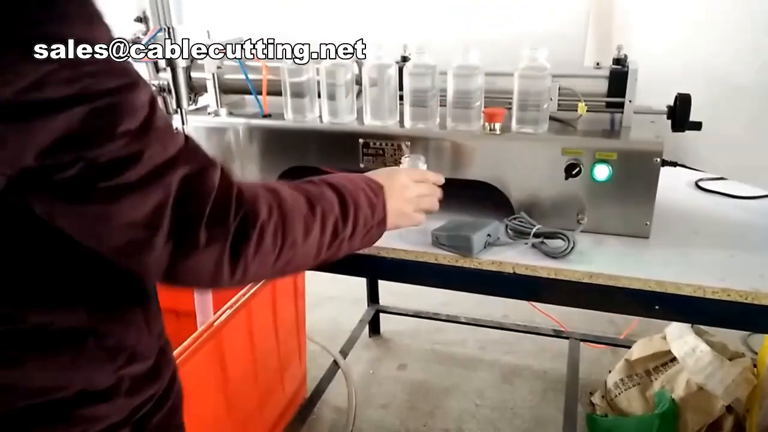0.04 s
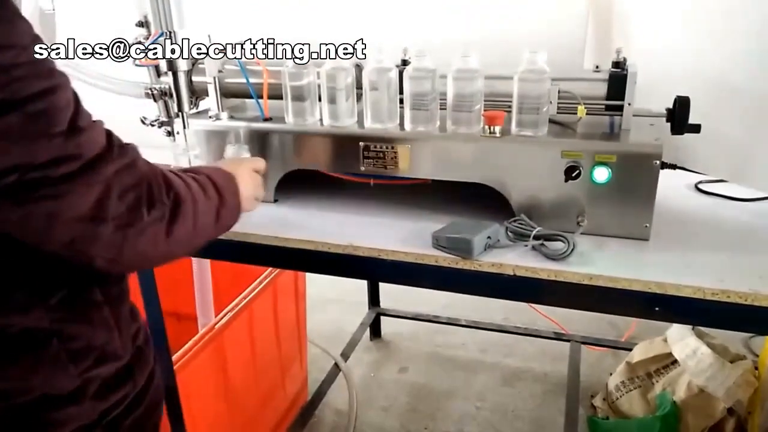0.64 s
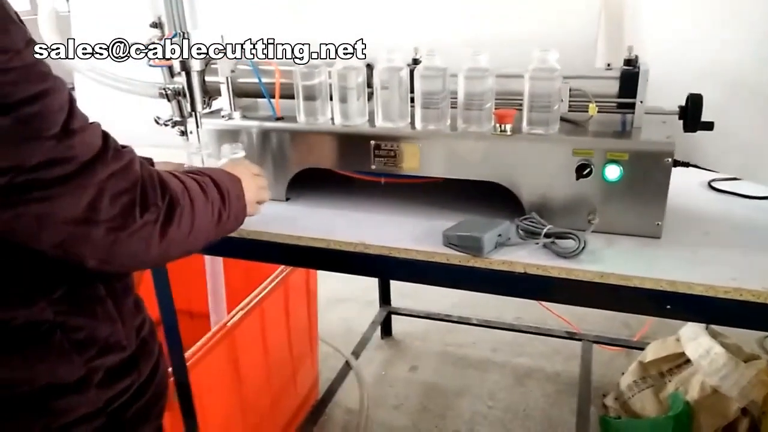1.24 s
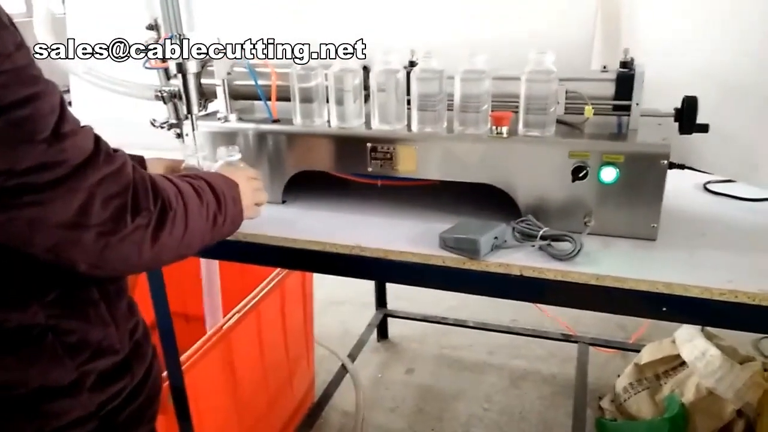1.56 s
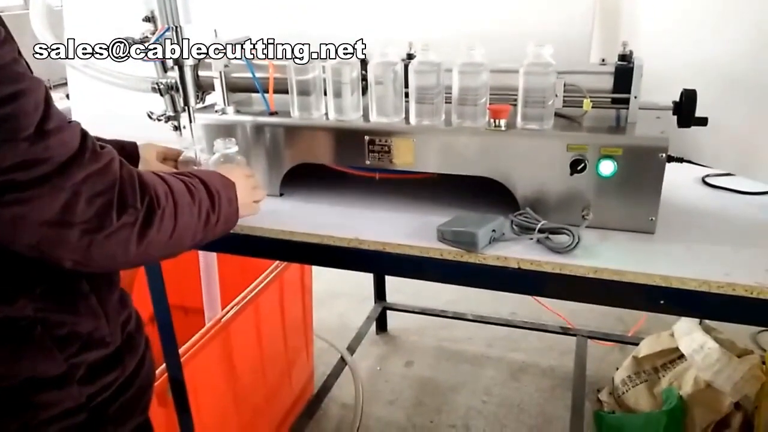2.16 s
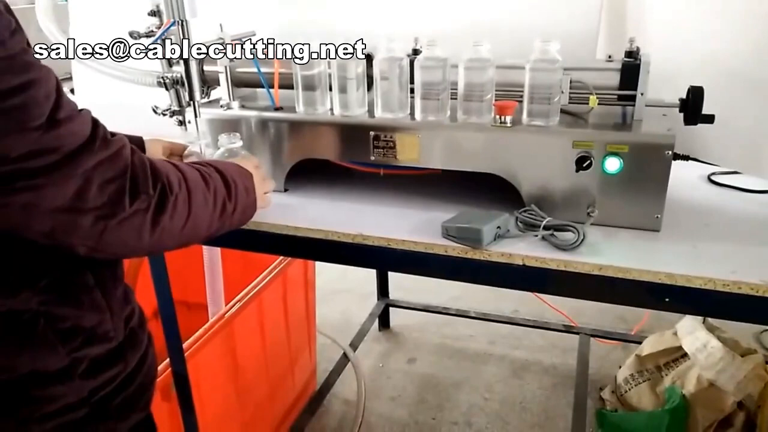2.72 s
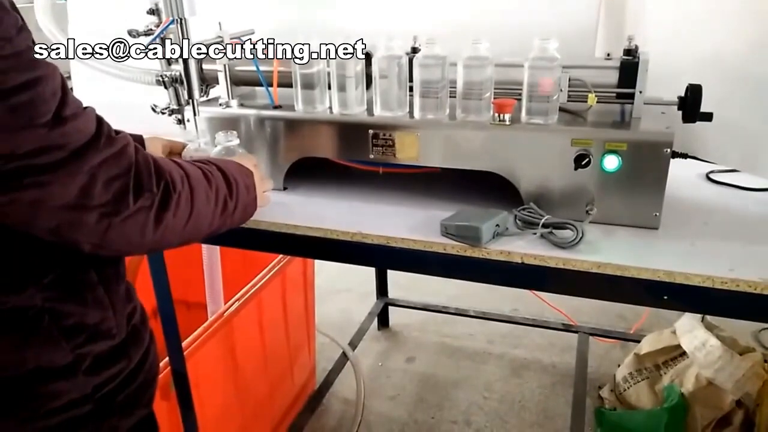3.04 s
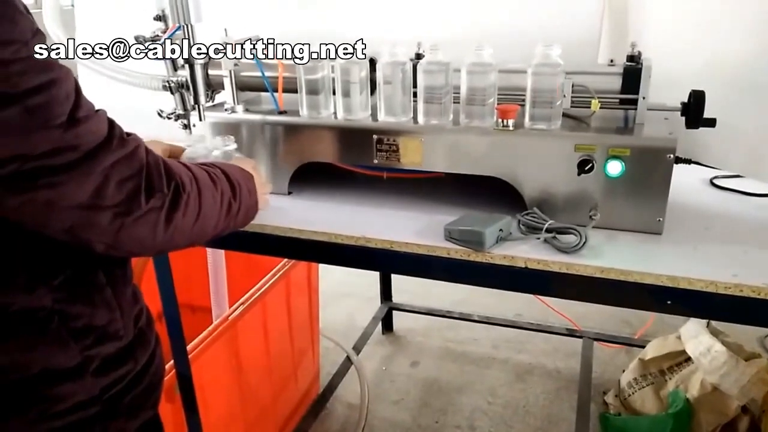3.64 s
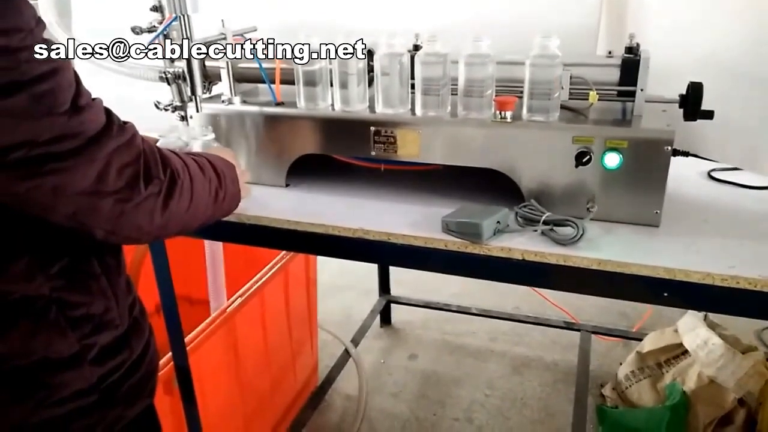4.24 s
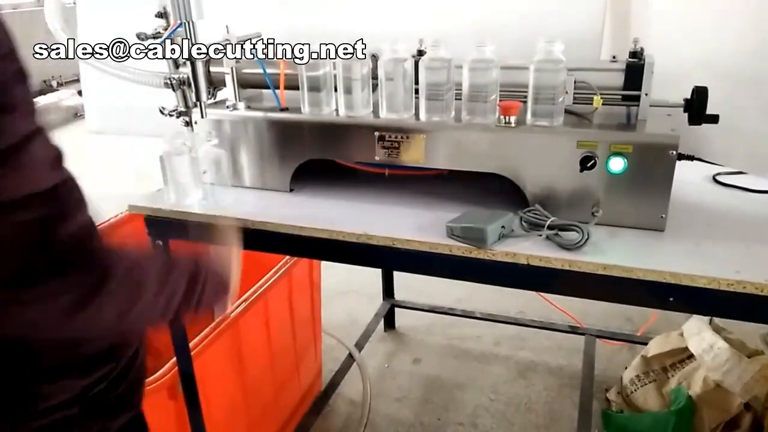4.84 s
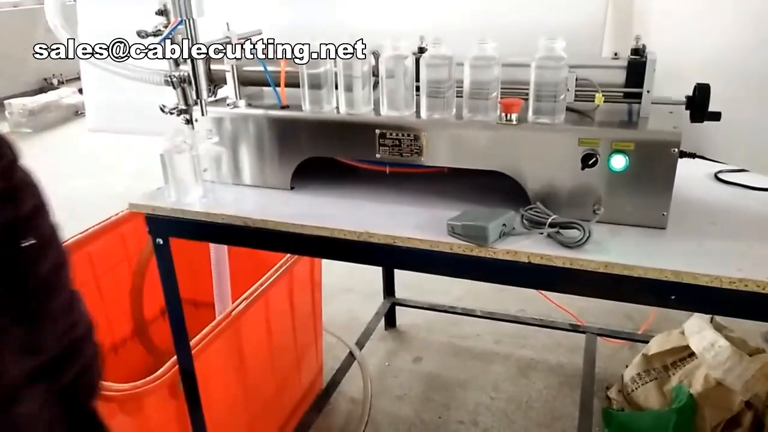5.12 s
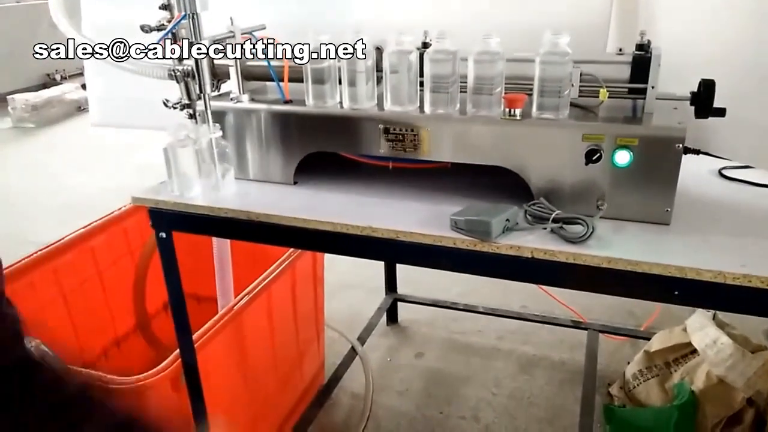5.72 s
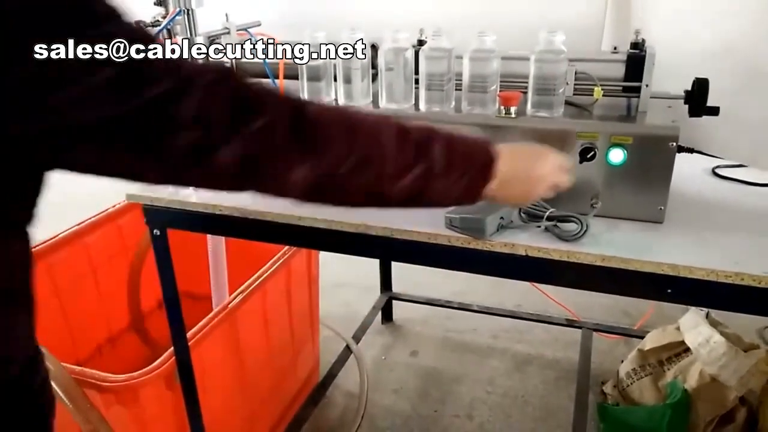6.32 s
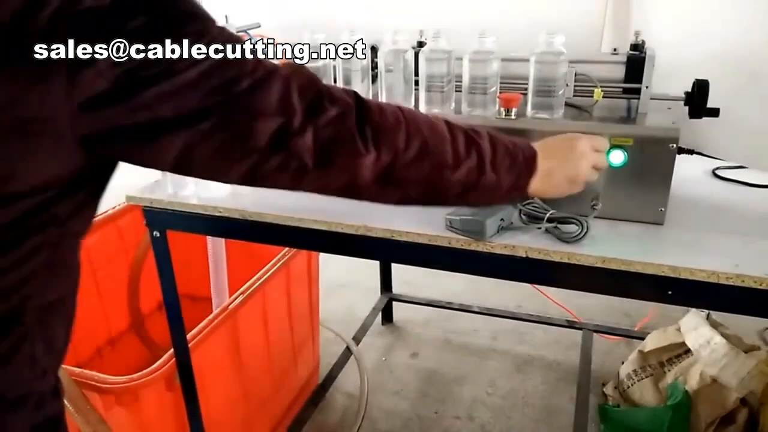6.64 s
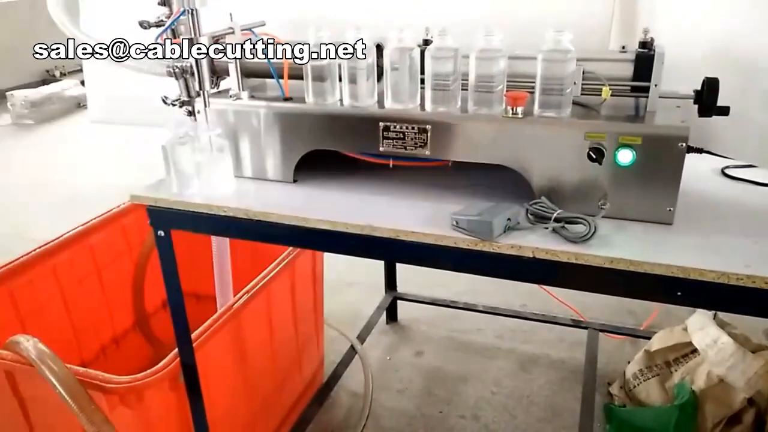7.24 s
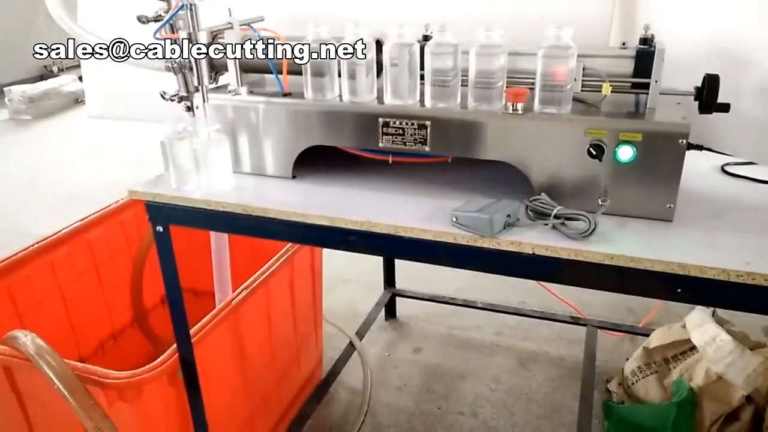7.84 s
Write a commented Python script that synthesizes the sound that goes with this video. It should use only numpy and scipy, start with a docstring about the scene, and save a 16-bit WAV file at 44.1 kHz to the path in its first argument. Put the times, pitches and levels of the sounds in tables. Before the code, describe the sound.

Close to a pneumatic filler in a slightly echoing workshop, a thin air leak and faint hum run throughout. After a small puff and quiet bottle taps, a loud spit of air and a metallic thump start a long hissing piston stroke. Another burst and thump bring a brief return hiss. A faint whine wavers far off, a switch clicks with a puff, things clatter lightly, and a last sharp blast and thud hit.

```python
"""A piston filler in a bare workshop

An air-driven filling machine works on a steel bench. At each end of the stroke a valve dumps air and
the piston thumps the frame; the cylinder then hisses out through its throttle, a narrow opening.
A plastic bottle is handled and a switch is turned with a small puff of air. The air line leaks
steadily over a low motor hum, and something whines faintly far away."""
import sys
import numpy as np
from scipy import signal
from scipy.fft import rfft, irfft, next_fast_len
from scipy.io import wavfile
from scipy.ndimage import uniform_filter1d

SR = 44100
rng = np.random.default_rng(int(sys.argv[2]) if len(sys.argv) > 2 else 0)


def store_wav(level_fs):
    """Save 16-bit WAV to argv[1]."""
    pcm = np.round(np.clip(np.atleast_2d(level_fs), -1, 1) * 32767)
    wavfile.write(sys.argv[1], SR, pcm.T.astype(np.int16))


N = 351477
TIME = np.arange(N) / SR

# blows on the machine's frame (time [s], clatter [dB], boom [dB], thud [dB])
BLOWS = [(0.304, -43.5, -53, -32), (.678, -47, -48, -39), (3.1866, -23.5, -29, -13.5),
         (3.334, -32, -42, -40), (3.603, -35, -44, -31), (5.099, -27.5, -30.5, -12.5),
         (5.219, -37, -56, -49), (7.551, -37.5, -49, -27.5), (7.578, -33.5, -41.5, -36),
         (7.62, -37.5, -41, -32), (7.673, -38, -50, -40), (7.8965, -24.5, -25, -13)]
# how alike scattered sound is on the left and right (frequency [Hz], likeness [1 = the same])
LIKENESS = [(150, 1), (350, 0.95), (700, 0.52), (1300, -0.059), (3000, 0.1), (4600, -0.022), (7000, 0.13)]


def valves(sputter_db=1.52):
    """A valve snaps open and trapped air sputters out, with a sizzle on top and a metal rattle."""
    # puffs and blasts; "t60" is always the time a sound takes to fade by 60 dB
    # (time [s], level [dB], rise [s], t60 [s], sizzle compared with the blast [dB])
    exhausts = [(0.295, -39.5, 0.0089, 0.58, -16.5), (3.182, -9.5, 0.0087, 0.27, -9.5),
                (3.595, -32, 0.013, 0.19, -11), (5.096, -15.5, 0.011, 0.12, -6),
                (5.114, -21, 0.0089, 0.22, -13), (6.788, -28.5, 0.0072, 0.18, -10),
                (7.892, -10, 0.018, 0.25, -10)]
    # tone colour of the blast (frequency [Hz], level [dB])
    exhaust_colour = [(600, -22.5), (1700, -14.5), (2300, -34.5), (2800, -5), (4200, -5), (4800, -6),
                      (5500, -0.5), (6400, 2), (7200, 3), (7700, -23), (8400, -57)]
    # whistles of the valve openings (pitch [Hz], width [Hz], level [dB])
    port_rings = [(4305, 37, -19), (5933, 73, -11), (6100, 120, -17), (6540, 200, -5)]
    # tone colour of the sizzle (frequency [Hz], level [dB])
    sizzle_colour = [(6800, -43.5), (7500, 8.5), (8150, -6.5), (8600, 6.5), (9550, -12.5), (9800, -47.5)]
    blast = sum(burst(start, db, rise, t60) for start, db, rise, t60, _ in exhausts)
    sizzle = sum(burst(start, db + extra_db, rise, t60) for start, db, rise, t60, extra_db in exhausts)
    hiss = bench_echoes(jet(exhaust_colour, port_rings, direct=0.13), strength=0.95, reach_s=0.008)
    spray = noise(sizzle_colour, direct=1.0)
    hiss, spray = (shimmer(x, depth_db=5.5, span_s=0.2, width_hz=66) for x in (hiss, spray))
    air = blast * hiss + sizzle * spray + rattle(blast)
    return from_db(sputter_db * drift(0.0022)) * beamed(air, left_db=5.0, above_hz=5100)


def rattle(blast, hits_per_s=150, width_hz=9):
    """A blast shakes loose metal fittings; each hit rings their notes with random strengths."""
    # notes of the fittings (pitch [Hz], level [dB])
    fittings = [(2790, -15), (3850, -4), (4296, -1), (6126, 2.5), (6286, 0), (6702, 1.5), (7068, 0.5)]
    hits = blast * (rng.random(N) < hits_per_s / SR) * np.sqrt(SR / hits_per_s)
    ringing = sum(from_db(db) * ring(hits * rng.standard_normal((2, N)) + 1e-18, hz, width_hz)
                  for hz, db in fittings)
    return from_db(-17) * ringing * np.sqrt(SR / (np.pi * width_hz))


def frame():
    """The piston hits its stop: the frame thuds, loose parts clatter and the housing booms."""
    # tone colour of the clatter (frequency [Hz], level [dB])
    clatter_colour = [(50, -19), (100, 6), (190, -1.5), (380, -3.5), (490, -7), (660, -31), (1000, -5),
                      (1500, -14.5), (1800, -1.5), (2200, -29.5), (4000, -29), (7000, -5.5), (8500, -45)]
    # notes of the steel housing and fittings (pitch [Hz], level [dB], t60 [s])
    housing_notes = [(132.8, -1, 0.16), (152, -7.5, 0.13), (178, 0, 0.2), (230, -4.5, 0.071),
                     (257.6, -6.5, 0.091), (593, -5, 0.13), (655, 2, 0.08), (818, -11, 0.25),
                     (1787, -7.5, 0.038)]
    times, _, boom_db, _ = np.transpose(BLOWS)
    shaking = sum(burst(start, db, rise=0.00033, t60=0.085) for start, db, _, _ in BLOWS)
    clatter = shaking * noise(clatter_colour, direct=0.89)
    boom = from_db(0.5) * strike(times, boom_db, housing_notes, scatter_db=4.5)
    return thuds() + clatter + boom


def thuds(contact_s=0.00034, rebound_s=0.0012):
    """A heavy part hits the frame and bounces once; far walls send back a duller thud."""
    # quickly dying notes of the frame (pitch [Hz], width [Hz], level [dB])
    frame_notes = [(169, 176, 8.5), (785, 1150, 1)]
    # echoes from far walls (delay [s], level [dB])
    wall_echoes = [(.135, -14.5), (.17, -16), (0.278, -16.5)]
    force = sum(from_db(db) * np.exp(-np.minimum(((TIME - start - lag) / contact_s) ** 2, 20))
                for start, _, _, db in BLOWS for lag in (0, rebound_s))
    thud = sum(from_db(db) * ring_twice(force, hz, width) for hz, width, db in frame_notes)
    dull = signal.sosfilt(signal.butter(2, 300, fs=SR, output="sos"), thud)
    echoes = sum(from_db(db) * np.interp(TIME - delay, TIME, dull, left=0) for delay, db in wall_echoes)
    return thud + echoes


def cylinder_vent(rise_s=0.023, stop_t60_s=0.37):
    """Air surges through the throttle as the pressure evens out, then flows until the piston stops."""
    # strokes, out and back (start [s], length [s], travel hiss [dB], surge [dB], surge t60 [s])
    strokes = [(3.19, 1.576, -42, -30, 3.03), (5.081, 0.27, -37.5, -19.5, 0.1)]
    # tone colour of the venting air (frequency [Hz], level [dB])
    vent_colour = [(800, -11), (1800, -4.5), (3000, 0.5), (3300, 3), (3600, 7), (4400, 5), (5200, 5),
                   (5900, 4), (6400, 10), (7000, 2.5), (7220, 7), (7700, -48.5)]
    # whistles of the throttle (pitch [Hz], width [Hz], level [dB])
    throttle_rings = [(5250, 380, -4.5), (6170, 100, -10), (6510, 150, -15.5)]
    flow = 0
    for start, length, travel_db, surge_db, surge_t60 in strokes:
        travel = from_db(travel_db) * np.clip((TIME - start) / rise_s, 0, 1)
        surge = burst(start, surge_db, rise_s, surge_t60)
        moving = from_db(-60 * np.clip((TIME - start - length) / stop_t60_s, 0, 10))
        flow += moving * np.hypot(travel, surge)
    hiss = bench_echoes(jet(vent_colour, throttle_rings), strength=0.78, reach_s=0.012)
    hiss = shimmer(hiss, depth_db=5.0, span_s=0.035, width_hz=80)
    return flow * from_db(1.3 * drift(0.004)) * beamed(hiss, left_db=7.0, above_hz=4720)


def handling():
    """Hollow things catch and slip as they slide to rest; the bottle and switch tap and clack."""
    # pushes along the bench (time [s], level [dB], rise [s], hollow pitch [Hz])
    scuffs = [(.1, -51, 0.065, 280), (0.668, -53, 0.032, 383), (2.101, -45, 0.13, 250),
              (2.518, -44, 0.019, 710), (4.55, -43.5, 0.045, 360), (7.538, -34, 0.018, 318)]
    # tone colour of the rubbing (frequency [Hz], level [dB])
    rub_colour = [(60, -4.5), (130, 0), (270, -6.5), (480, -9.5), (700, -10.5), (1100, -12.5),
                  (2000, -12.5), (3500, -18), (7000, -18), (7600, -62.5)]
    # taps that each ring one note (time [s], pitch [Hz], level [dB])
    taps = [(.16, 920, -54), (0.677, 810, -52.5), (1.16, 590, -54), (1.47, 830, -52), (1.559, 784, -55),
            (1.809, 880, -55.5), (5.584, 5700, -38), (5.655, 5430, -38), (6.581, 790, -49),
            (6.68, 800, -55), (6.797, 790, -50), (6.798, 2180, -45.5), (6.832, 885, -51.5)]
    # crisp clacks (time [s], level [dB])
    clacks = [(0.303, -39.5), (6.793, -37.5), (7.582, -36), (7.62, -41)]
    # tone colour of the clacks (frequency [Hz], level [dB])
    clack_colour = [(500, -7), (1300, -2.5), (3500, 4.5), (7000, -23), (8000, -53)]
    contact = rng.standard_normal(N)
    sliding, hollow, tapping = 0, 0, 0
    for start, db, rise, hz in scuffs:
        push = burst(start, db, rise, t60=1.31)
        sliding += push
        hollow += push * rms_one(ring_twice(contact, hz, width=0.38 * hz))
    rubbing = sliding * noise(rub_colour, direct=0.088) + from_db(-8.5) * hollow
    rubbing *= from_db(2.3 * drift(0.012))  # catching and slipping
    for start, hz, db in taps:
        t60 = min(240 / hz, 0.26)  # high ticks die in 240 cycles; the hand damps the low ones
        note = rms_one(ring(contact, hz, width=0.083 * hz))
        tapping += burst(start, db, rise=0.0023, t60=t60) * note
    clacking = sum(burst(start, db, rise=0.0031, t60=0.16) for start, db in clacks) * noise(clack_colour)
    return rubbing + tapping + clacking


def air_leak(level_db=-45.5):
    """A loose fitting hisses with a slight flutter, softer while the operator leans across it."""
    # the operator blocks the hiss (from [s], until [s], time to move in or out [s], loss [dB])
    start, end, move_s, loss_db = (6.08, 7.25, 0.22, 3.8)
    # tone colour of the leak (frequency [Hz], level [dB])
    leak_colour = [(1500, -21.5), (2600, -29), (3000, -4.5), (3400, -10), (3700, 0), (4500, -3),
                   (4850, 3.5), (5500, 1.5), (5730, -12.5), (5850, 0.5), (6500, 2.5), (7050, 2),
                   (7450, -41), (10000, -40)]
    # breathy whistles of the fitting (pitch [Hz], width [Hz], level [dB])
    leak_rings = [(4850, 140, -21.5), (5080, 150, -15), (5820, 74, -13.5), (6470, 42, -14.5)]
    blocked = fade_in_out(start, end, move_s)
    hiss = bench_echoes(jet(leak_colour, leak_rings), strength=0.99, reach_s=0.016)
    hiss = shimmer(hiss, depth_db=3.5, span_s=0.04, width_hz=60)
    flutter_db = 0.99 * drift(0.0184)
    return from_db(level_db - loss_db * blocked + flutter_db) * beamed(hiss, left_db=12.0, above_hz=5240)


def far_whine(waver_hz=9.3, flicker_db=1.0):
    """A thin, wavering tone swells and fades as its pitch bends away and returns."""
    # distant whines (start [s], length [s], pitch [Hz], bend [Hz], level [dB])
    whines = [(5.622, 0.22, 673, 36.5, -55.5), (6.28, 0.22, 790, 29.5, -56),
              (6.515, 0.554, 773, -46.5, -54)]
    waver, out = waver_hz * drift(0.0129), 0
    for start, length, hz, bend_hz, db in whines:
        arc = np.abs(np.sin(np.pi * np.clip((TIME - start) / length, 0, 1)))
        out += from_db(db) * np.sqrt(arc) * sine(hz + bend_hz * arc + waver)
    return out * from_db(flicker_db * drift(0.044))


def hum():
    """A motor hums throughout; the cylinder adds a drone around its long stroke."""
    # tones of the motor (pitch [Hz], level [dB])
    motor = [(96.9, -69.5), (113, -65)]
    # tones of the cylinder (pitch [Hz], level [dB])
    drone = [(150.7, -61), (371.4, -66.5)]
    # when the cylinder drones (from [s], until [s], fade [s])
    start, end, fade_s = (2.53, 4.5, 0.1)
    return tones(motor) + fade_in_out(start, end, fade_s) * tones(drone)


def shop_rumble():
    """A soft, low noise fills the workshop."""
    # tone colour of the rumble (frequency [Hz], level [dB])
    rumble_colour = [(12, -29), (22, 0), (48, 3), (70, -11), (103, 0), (173, -10), (293, -10.5),
                     (418, -12.5), (784, -13), (988, -15), (2820, -15.5), (3000, -12), (3900, -41),
                     (6600, -120)]
    return from_db(-50.5) * noise(rumble_colour)


def room_echo(x, build_cycles=5.0):
    """The bare room's echoes blur into a tail that builds and dies away; the bass builds slowest."""
    # how long the room rings (frequency [Hz], t60 [s])
    room_t60 = [(150, 1.0), (700, 1), (3000, 1), (6800, 1), (8500, 0.21)]
    age, hz = TIME[:SR], np.arange(SR // 2 + 1)
    mid, side = rfft(rng.standard_normal((2, SR)))
    spectrum = stereo(mid, side, at_hz(LIKENESS, hz))
    edges_hz, tail = np.geomspace(40, 12000, 16), 0
    for low, high in zip(edges_hz, edges_hz[1:]):
        centre = np.sqrt(low * high)
        build = 1 - np.exp(-age * centre / build_cycles)
        shape = build * from_db(-60 * age / at_hz(room_t60, centre))
        band = irfft(spectrum * ((hz >= low) & (hz < high)), SR)
        tail += band * shape / np.sqrt(2 * np.sum(shape ** 2))
    return signal.fftconvolve(x, tail, axes=1)[:, :N]


def jet(colour, rings, direct=0):
    """Rushing air, part of which whistles at the pitches its opening favours."""
    flow = noise([(100, 0), (10000, 0)], direct)  # equally strong at all frequencies
    whistles = sum(from_db(db) * rms_one(ring_twice(flow, hz, 2 * width)) for hz, width, db in rings)
    return rms_one(noise(colour, direct) + whistles)


def bench_echoes(x, strength, reach_s, count=10):
    """Quick echoes off housing, bench and wall boost some pitches of a hiss and weaken others."""
    out = x.copy()
    for side in range(2):
        for place, sign in zip(rng.random(count), rng.choice([-1, 1], count)):
            lag = 1 + int(place * reach_s * SR)
            out[side, lag:] += sign * strength / np.sqrt(count) * x[side, :-lag]
    return out / np.sqrt(1 + strength ** 2)


def shimmer(x, depth_db, span_s, width_hz, size=1024):
    """Narrow bands of a hiss swell and fade on their own, so its colour never stands still."""
    _, _, bands = signal.stft(x, nperseg=size)
    swell = rng.standard_normal(bands.shape[1:])
    # smooth the random swells across frequency, then across time
    for axis, cells in enumerate((width_hz * size / SR, 2 * span_s * SR / size)):
        swell = signal.lfilter([1], [1, -np.exp(-1 / cells)], swell, axis=axis)
    gain = from_db(depth_db * np.clip(rms_one(swell), -2, 2))
    _, hiss = signal.istft(bands * gain, nperseg=size)
    return rms_one(hiss[:, :N])


def beamed(x, left_db, above_hz):
    """A jet's highest hiss travels in a beam, so it is louder on the left."""
    size = next_fast_len(N)
    hz = np.arange(size // 2 + 1) * SR / size
    treble = 1 / (1 + (above_hz / (hz + 1)) ** 20)
    gain = from_db(np.array([[left_db], [-left_db]]) / 2 * treble)
    return irfft(rfft(x, size) * gain, size)[:, :N]


def strike(times, levels_db, notes, scatter_db):
    """Each blow rings all the notes of the metal, each with a partly random strength."""
    out = np.zeros(N)
    scatter = scatter_db * rng.standard_normal((len(times), len(notes)))
    strengths = from_db(levels_db[:, None] + scatter)
    for k, (hz, db, t60) in enumerate(notes):
        clicks = np.full(N, 1e-18)
        clicks[(times * SR).astype(int)] = strengths[:, k] * from_db(db) * (-1) ** k
        decay, angle = from_db(-60 / (t60 * SR)), 2 * np.pi * hz / SR
        out += signal.lfilter([0, np.sin(angle)], [1, -2 * decay * np.cos(angle), decay ** 2], clicks)
    return out


def ring(x, hz, width):
    """A resonance: lets through a band about `width` Hz wide around one pitch."""
    decay, angle = np.exp(-np.pi * width / SR), 2 * np.pi * hz / SR
    feed = np.array([1, 0, -1]) * (1 - decay ** 2) / 2
    return signal.lfilter(feed, [1, -2 * decay * np.cos(angle), decay ** 2], x)


def ring_twice(x, hz, width):
    """The same resonance twice over, so less gets through away from its pitch."""
    return ring(ring(x, hz, width), hz, width)


def tones(table, waver_hz=0.93, flutter_db=3.0):
    """Held tones, each wavering a little in level and pitch."""
    return sum(from_db(db + flutter_db * drift(0.15)) * np.sqrt(2) * sine(hz + waver_hz * drift(0.11))
               for hz, db in table)


def sine(hz):
    """A pure tone that follows a changing pitch."""
    return np.sin(2 * np.pi * np.cumsum(hz) / SR)


def noise(colour, direct=0):
    """Stereo noise of a given tone colour; the direct share is alike on both sides."""
    size = next_fast_len(N)
    hz = np.arange(size // 2 + 1) * SR / size
    mid, side = rfft(rng.standard_normal((2, size))) * from_db(at_hz(colour, hz))
    alike = direct + (1 - direct) * at_hz(LIKENESS, hz)
    return rms_one(irfft(stereo(mid, side, alike), size)[:, :N])


def stereo(mid, side, alike):
    """Make left and right from a shared part (mid) and an opposite part (side)."""
    alike = np.clip(alike, -1, 1)
    return np.sqrt(1 + alike) * mid + np.sqrt(1 - alike) * side * [[1], [-1]]


def burst(start, level_db, rise, t60):
    """A loudness curve: a straight rise, then a fade of 60 dB every t60 seconds."""
    out = np.zeros(N)
    sounding = slice(max(0, int(start * SR)), int((start + rise + 2 * t60) * SR))
    age = TIME[sounding] - start
    fade_db = 60 * np.maximum(age - rise, 0) / t60
    out[sounding] = np.clip(age / rise, 0, 1) * from_db(level_db - fade_db)
    return out


def fade_in_out(start, end, fade_s):
    """A curve that climbs from 0 to 1, holds, and comes back down."""
    return np.clip(np.minimum(TIME - start, end - TIME) / fade_s, 0, 1)


def drift(span_s):
    """A random wobble of typical size 1 that changes over about span_s seconds."""
    size = max(2, int(span_s * SR))
    return rms_one(uniform_filter1d(uniform_filter1d(rng.standard_normal(N), size), size))


def at_hz(points, hz):
    """Read between the rows of a table, giving every octave equal room."""
    table_hz, values = np.transpose(points)
    return np.interp(np.log(hz + 1e-9), np.log(table_hz), values)


def from_db(db):
    """Turn decibels into a number to multiply by."""
    return 10 ** (np.asarray(db) / 20)


def rms_one(x):
    """Scale a signal so its typical size (rms) is 1."""
    return x / np.sqrt(np.mean(x ** 2) + 1e-20)


def scene():
    """The machine and the handling over hum and rumble; the whine is heard only as room echo."""
    air, blows, hands = valves(), frame(), handling()
    room = room_echo(from_db(-8) * air + from_db(-3) * blows + from_db(-2) * hands + far_whine())
    rumble = shop_rumble()
    return air + blows + hands + room + air_leak() + cylinder_vent() + hum() + rumble


def record(dry):
    """Round off the loudest peaks and cut the highest treble."""
    ceiling, cutoff_hz = 0.72, 9800
    rounded = dry / (1 + (dry / ceiling) ** 8) ** (1 / 8)
    return signal.sosfilt(signal.ellip(10, 0.1, 90, cutoff_hz, fs=SR, output="sos"), rounded)


dry = scene()
out = record(dry)
store_wav(out)
```